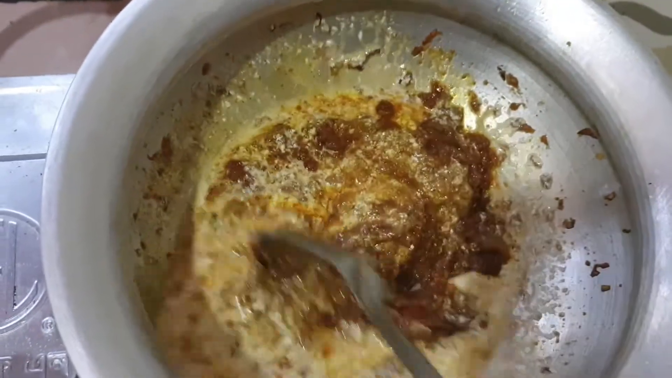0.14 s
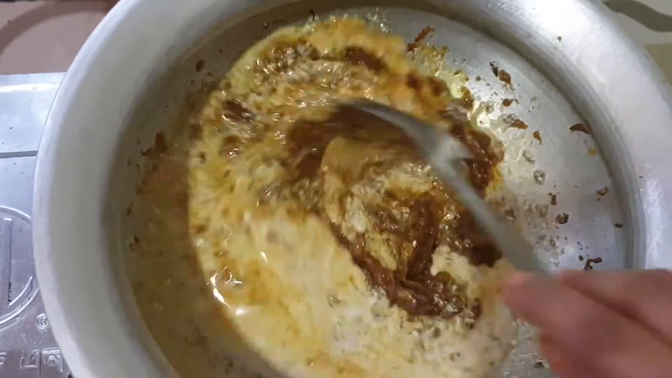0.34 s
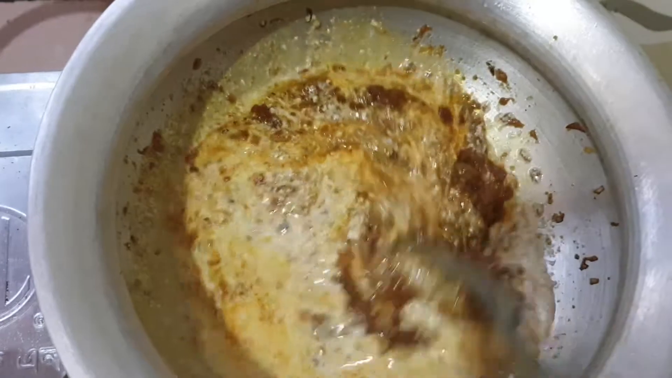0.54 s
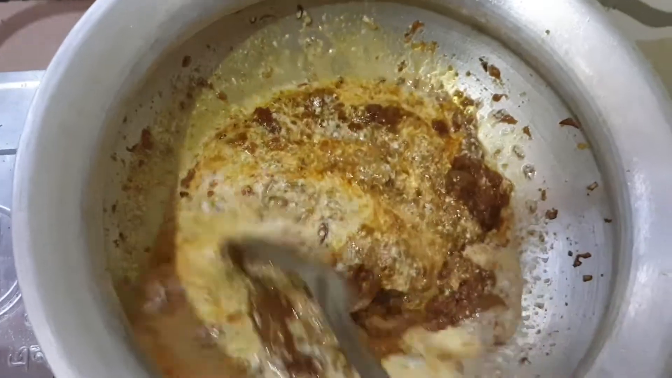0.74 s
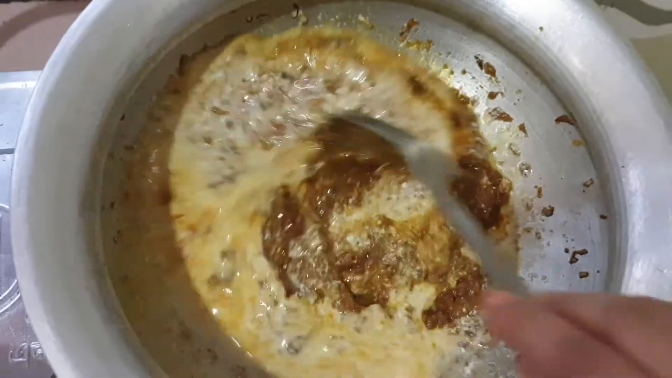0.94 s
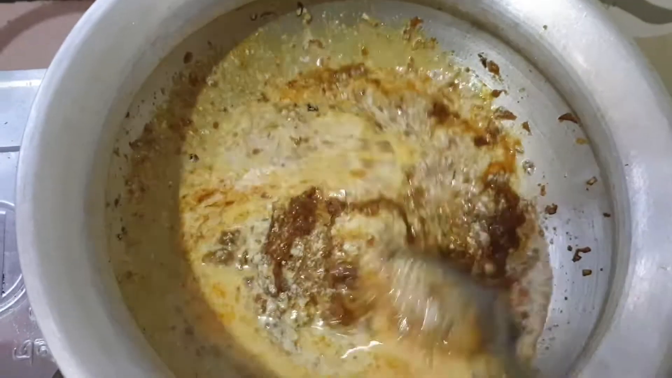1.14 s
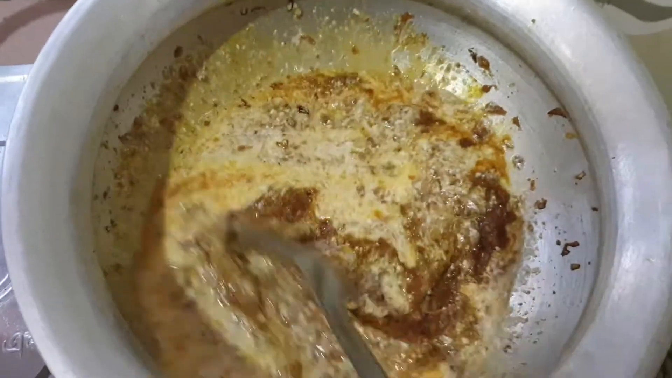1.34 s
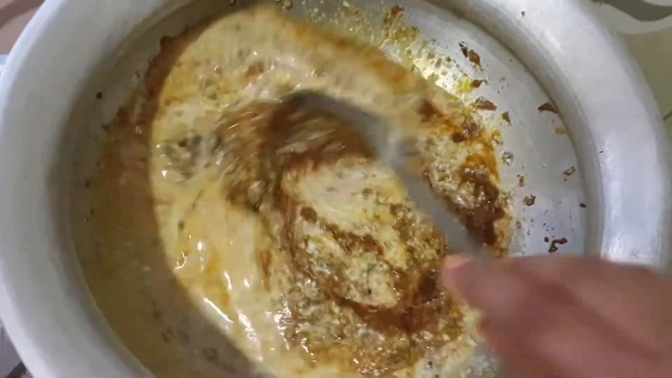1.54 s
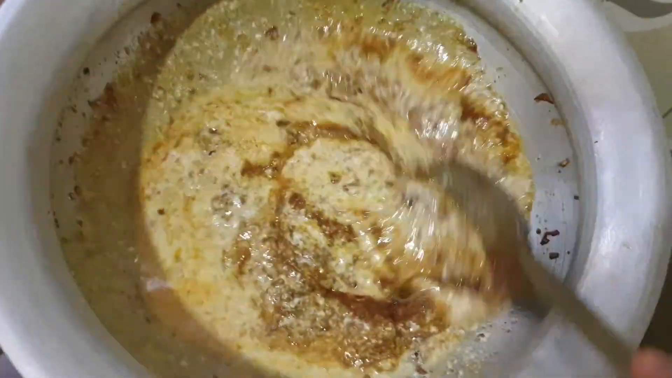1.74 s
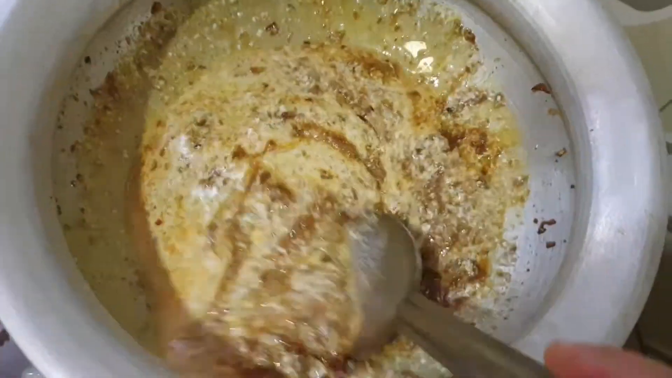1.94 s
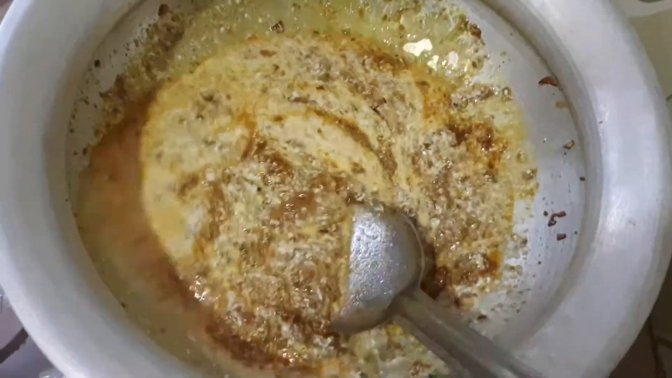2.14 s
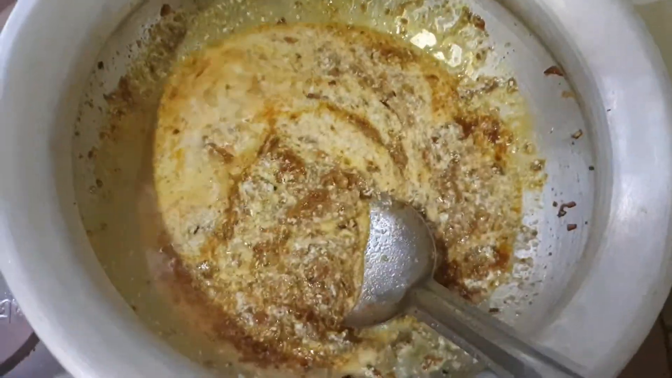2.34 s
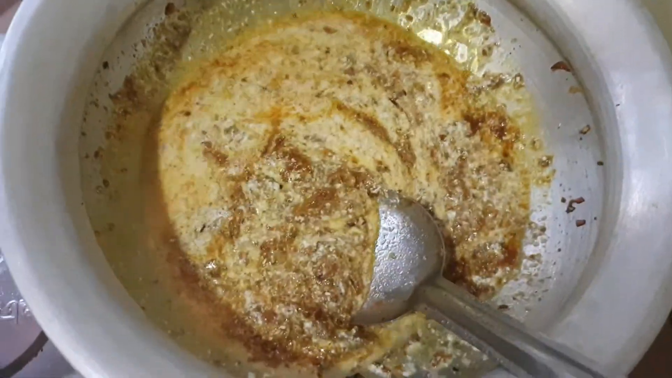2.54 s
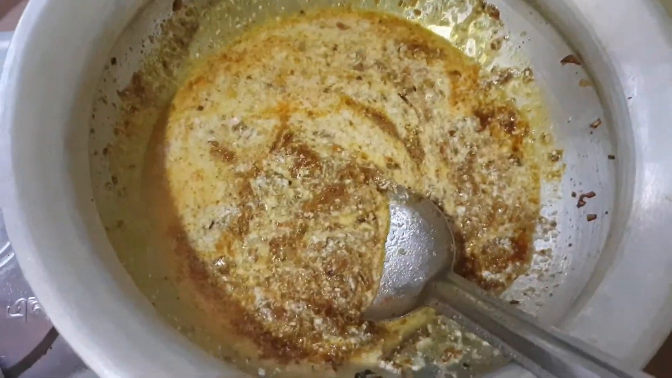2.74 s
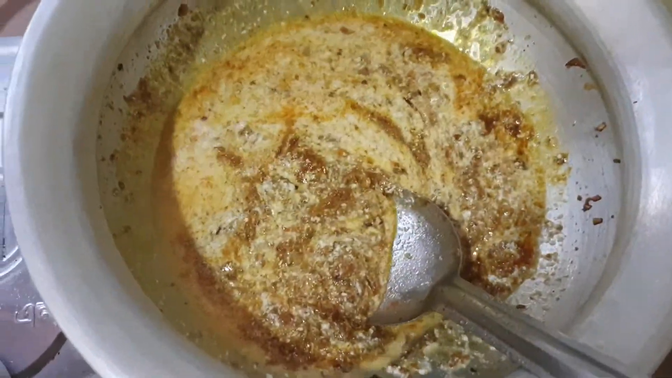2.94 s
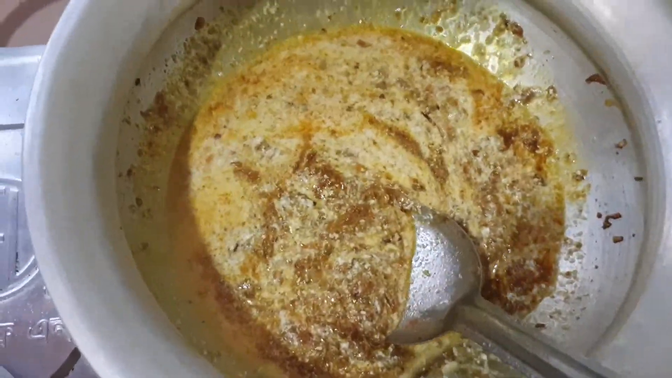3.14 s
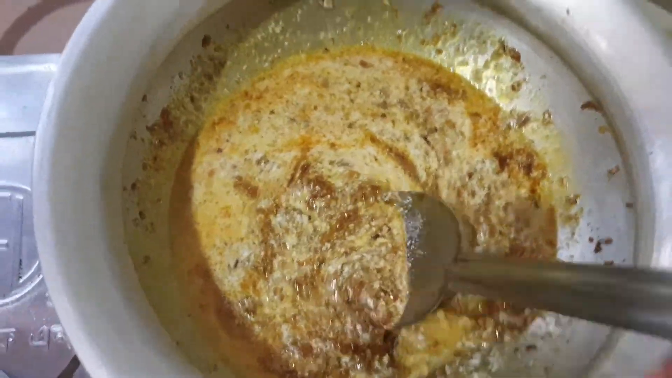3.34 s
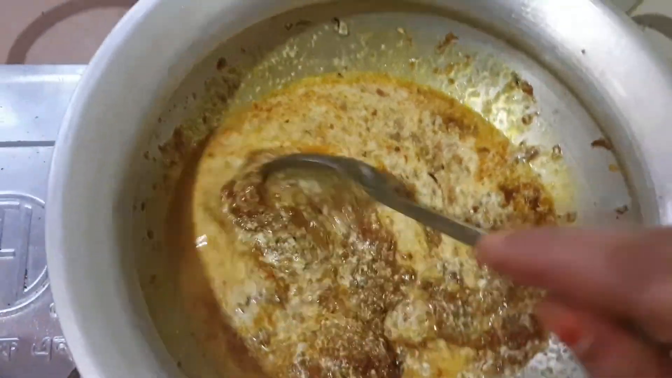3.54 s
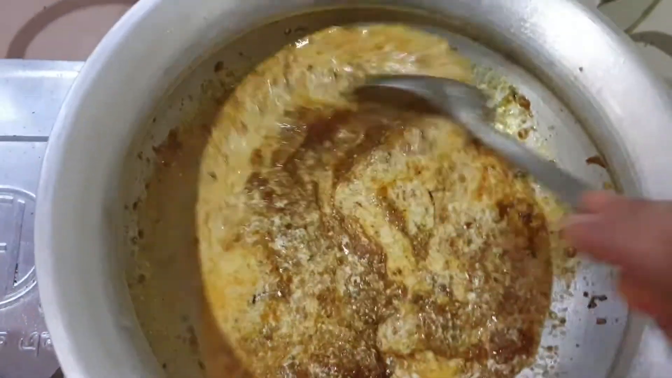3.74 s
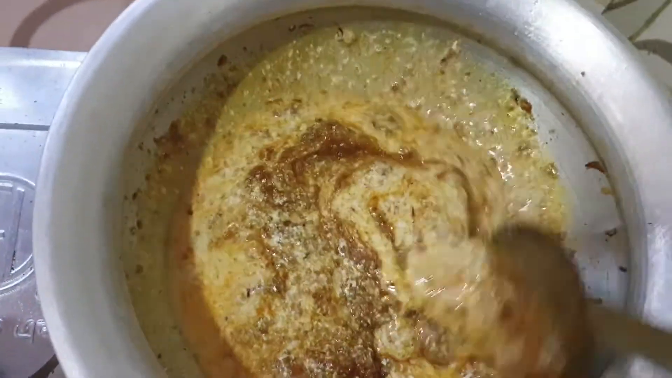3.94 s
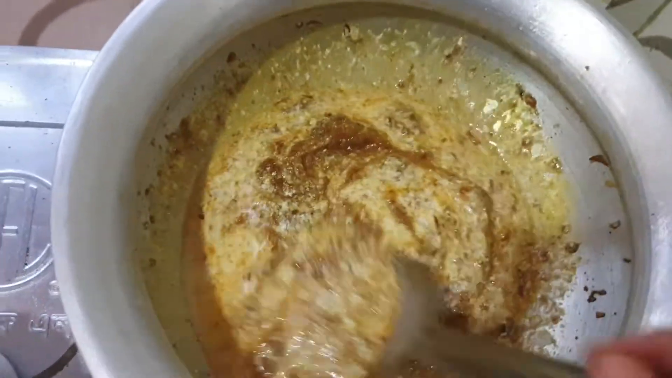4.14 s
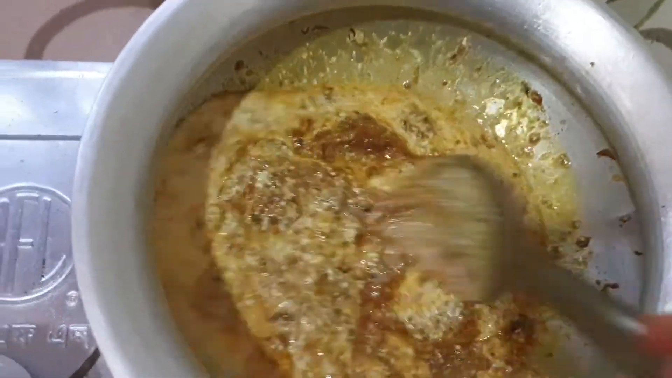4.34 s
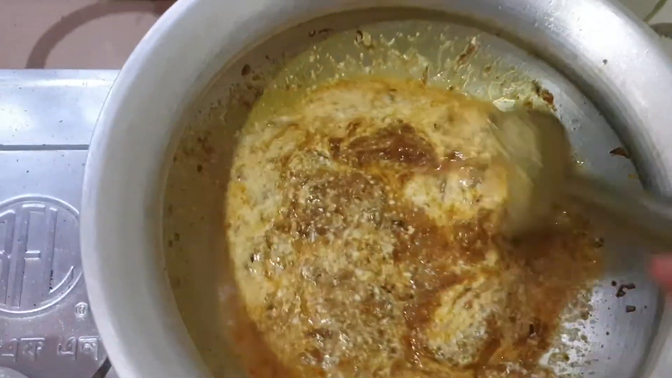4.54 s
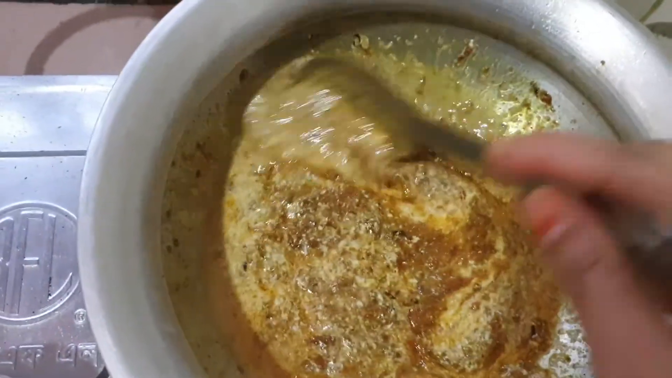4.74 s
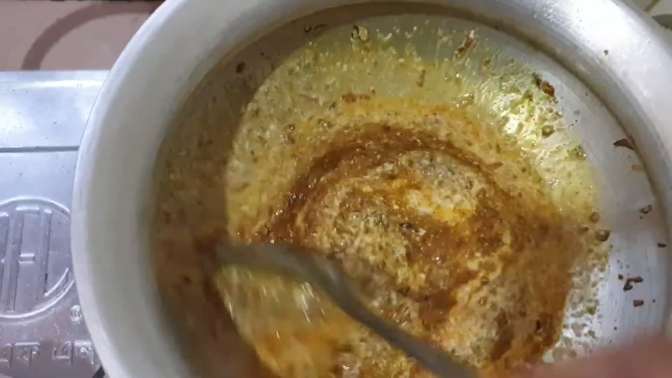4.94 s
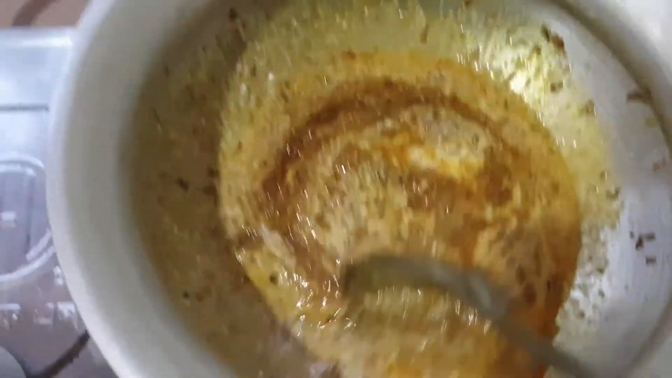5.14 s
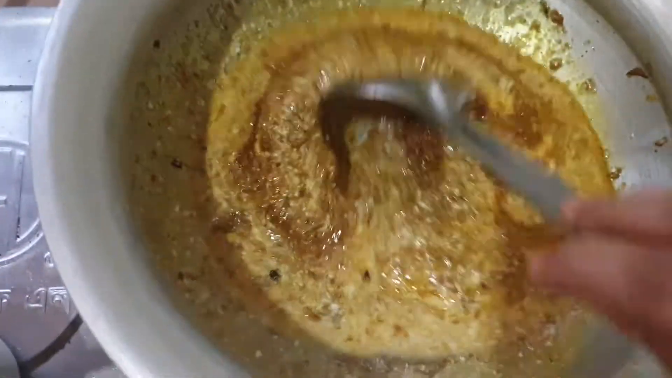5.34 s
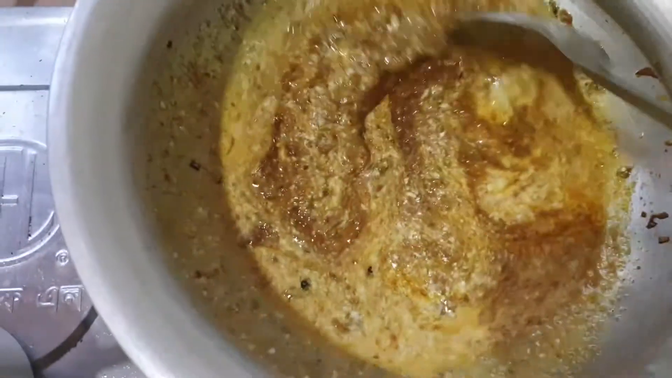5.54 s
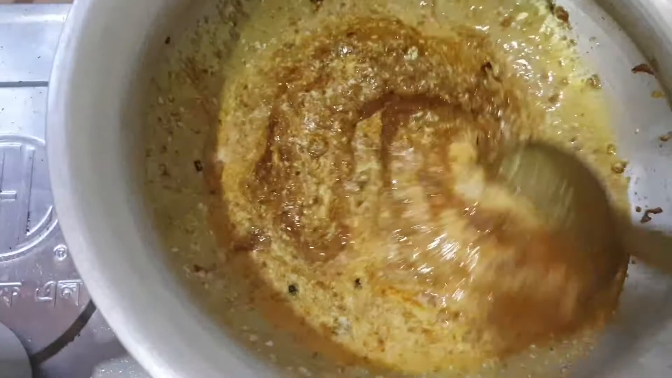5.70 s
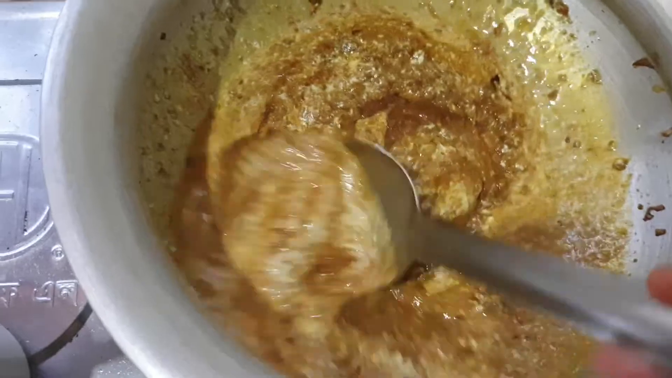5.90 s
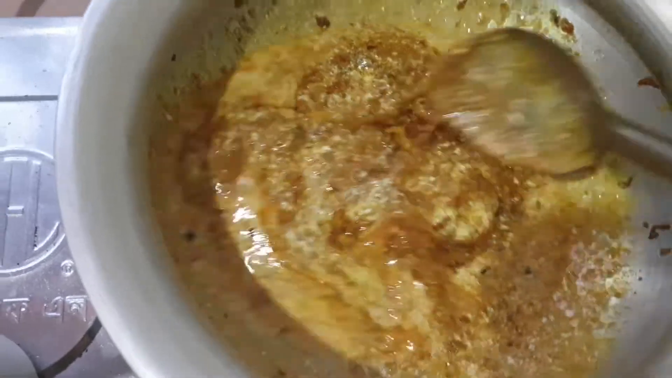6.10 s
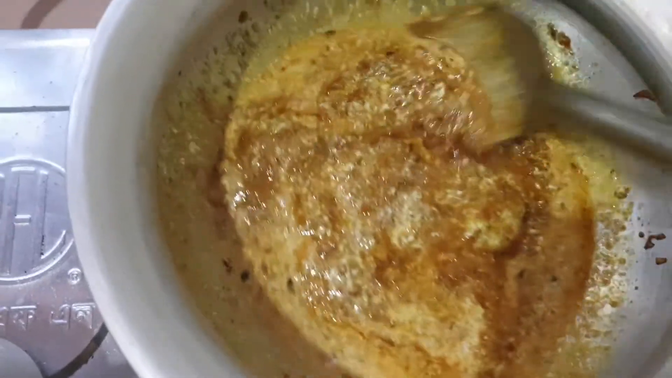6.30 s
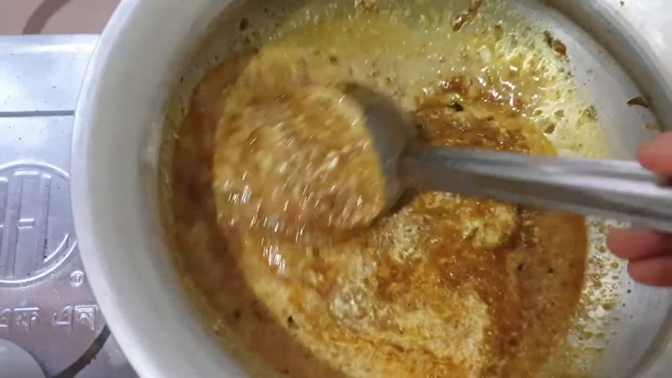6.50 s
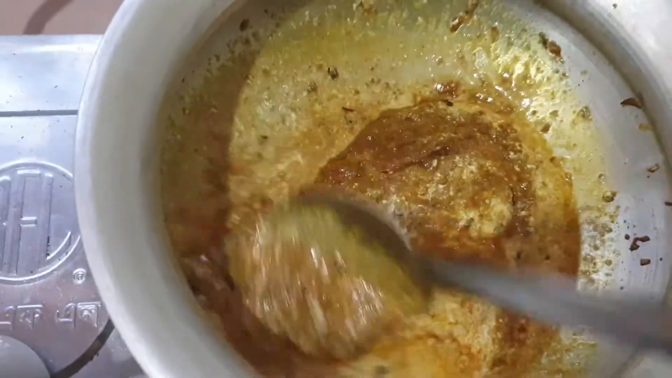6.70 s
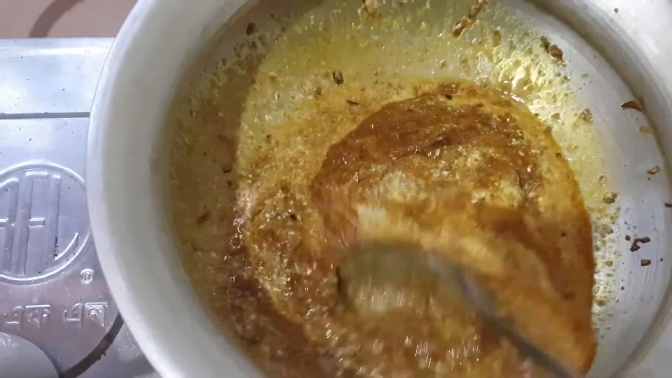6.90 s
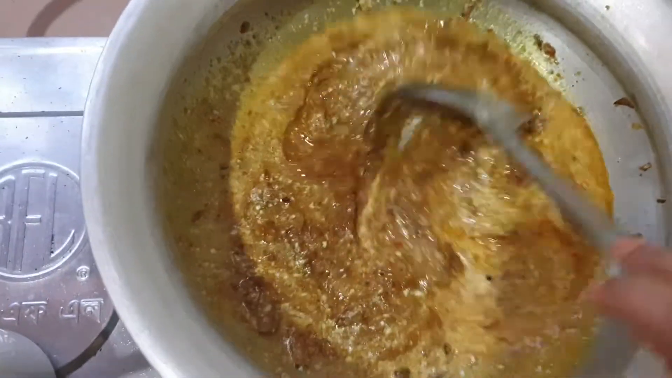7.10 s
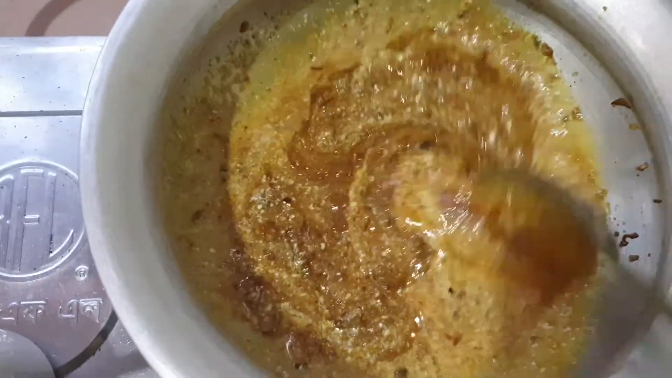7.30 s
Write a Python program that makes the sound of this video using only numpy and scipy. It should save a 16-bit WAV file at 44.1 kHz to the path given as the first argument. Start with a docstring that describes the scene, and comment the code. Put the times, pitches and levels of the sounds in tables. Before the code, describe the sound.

Heard from just above the pot, repeated gritty strokes rumble and rasp on thin metal while fine spitting gradually fades. After a sharp clatter comes a near-quiet gap, then steady frying hiss returns and builds. The spoon goes back in with uneven drags, dull thuds and hollow clacks, ending with a hard knock and hoarse squeaks. A faint room hum and short kitchen tail surround it.

```python
"""A steel spoon stirs thick gravy in an aluminium pot on a stove: slips shake the bottom, crushed spice grinds.
Stick-slip tones make judders and squeaks; knocks and one clatter against the wall ring decaying modes and noise.
Clouds of tiny clicks make a spitting hiss that flares with each scrape and sinks away; a fuller hiss then swells.
Single bubbles pop. Shaped noise makes the low simmer and the room; a short tail makes the small kitchen."""
import sys
import numpy as np
from scipy import signal
from scipy.fft import rfft, irfft, next_fast_len
from scipy.io import wavfile
from scipy.ndimage import uniform_filter1d

SR = 44100
rng = np.random.default_rng(int(sys.argv[2]) if len(sys.argv) > 2 else 0)


def transcribe(signal):
    """Save signal, clipped to [-1, 1], as a 16-bit WAV file at the path in sys.argv[1]."""
    frames = np.atleast_2d(signal).T
    limited = np.clip(frames, -1, 1)
    pcm = np.round(limited * 32767).astype(np.int16)
    wavfile.write(sys.argv[1], SR, pcm)


N = 324576
TIME = np.arange(N) / SR


def from_db(db):
    """Decibels to gain."""
    return 10 ** (np.asarray(db) / 20)


def rms_one(x):
    """Scale to unit power."""
    return x / np.sqrt(np.mean(x ** 2) + 1e-20)


def cut(x, hz, kind, order=2):
    """Causal Butterworth filter."""
    sos = signal.butter(order, np.clip(hz, 10, .45 * SR), kind, fs=SR, output="sos")
    return signal.sosfilt(sos, x + 1e-18)


def drift(rate_hz):
    """Slow random curve with unit RMS, drawn at SR / 40 and interpolated."""
    step, settle = 40, 2000
    noise = rng.standard_normal(N // step + settle + 1)
    slow = rms_one(cut(noise, step * rate_hz, "low")[settle:])
    return np.interp(np.arange(N) / step, np.arange(N // step + 1), slow)


def coloured(x, spectrum):
    """Give a steady texture its spectrum, rolled off below the first point."""
    hz, level_db = np.transpose(spectrum)
    size = next_fast_len(N)
    bins_hz = np.maximum(np.arange(size // 2 + 1) * SR / size, 1)
    gain = from_db(np.interp(np.log(bins_hz), np.log(hz), level_db))
    gain = gain * np.minimum(bins_hz / hz[0], 1) ** 2
    return irfft(rfft(x, size) * gain, size)[..., :N]


def levelled(x, band_hz, span_s):
    """Hold the power within a band near one, keeping flicker faster than span_s."""
    power = cut(np.atleast_2d(x).mean(axis=0), band_hz, "band", order=3) ** 2
    size = max(int(span_s * SR), 1)
    smooth = uniform_filter1d(uniform_filter1d(power, size), size)
    return x / np.sqrt(smooth + 1e-20)


def grains(per_s, spread_db):
    """Random clicks of uneven size and sign."""
    sizes = from_db(spread_db * np.minimum(rng.exponential(1, N), 4))
    signs = rng.choice([-1, 1], N)
    return sizes * signs * (rng.random(N) < per_s / SR)


def blows(start_s, level_db):
    """One click for each contact."""
    out = np.zeros(N)
    np.add.at(out, (np.asarray(start_s) * SR).astype(int), from_db(level_db))
    return out


def ring(clicks, modes):
    """Each click sets modes (hz, level_db, t60_s) ringing as decaying cosines."""
    out = 0
    for hz, level_db, t60_s in modes:
        r, w = from_db(-60 / (t60_s * SR)), 2 * np.pi * hz / SR
        mode = signal.lfilter([1, -r * np.cos(w)], [1, -2 * r * np.cos(w), r * r], clicks + 1e-18)
        out = out + from_db(level_db) * mode
    return out


def dying_noise(t60_s):
    """A stereo burst of unit energy per side that fades away."""
    t = TIME[:int(t60_s * SR) + 2]
    burst = rng.standard_normal((2, len(t))) * from_db(-60 * t / t60_s)
    return burst / np.sqrt(np.sum(burst ** 2, axis=1, keepdims=True))


def spread(x, response):
    """Pass a sound through a stereo response."""
    return signal.oaconvolve(np.atleast_2d(x), response, axes=1)[:, :N]


POT_AIR_T60_S = .035


def pot_air(x, direct_db=-10.0):
    """Sound bounces between the pot's walls and reaches each side differently."""
    return from_db(direct_db) * x + spread(x, dying_noise(POT_AIR_T60_S))


def fizz(per_s, spread_db, count=3):
    """Tiny clicks at several places in the pot, each with its own path out."""
    return sum(pot_air(grains(per_s / count, spread_db)) for place in range(count))


def travelling(x, depth_db, size=512):
    """As the contact moves over the metal, patches of its spectrum swell and fade."""
    bins = signal.stft(x, nperseg=size)[2]
    patches = rng.standard_normal(bins.shape[-2:])
    for axis, width in ((0, 4), (0, 4), (1, 7), (1, 7)):   # frequency, then time
        patches = uniform_filter1d(patches, width, axis=axis)
    return signal.istft(bins * from_db(depth_db * rms_one(patches)), nperseg=size)[1][..., :N]


def sloshed(x, detune):
    """Gravy shifts its weight over the bottom, so the modes wander in pitch (detune: RMS fraction)."""
    position = np.cumsum(1 + detune * drift(7.05))
    return np.interp(position % N, np.arange(N), x)


def dispersed(x, delay_s):
    """Bending waves in thin metal: lows travel slower, so a click becomes a chirp (delay_s at 1 kHz)."""
    size = next_fast_len(N + SR // 10)
    hz = np.arange(size // 2 + 1) * SR / size
    phase = np.exp(-4j * np.pi * delay_s * np.sqrt(1000 * hz))
    return irfft(rfft(x, size) * phase, size)[:N]


def stick_slip(start_s, length_s, glide_hz, level_db, wander, edge_s=0.015):
    """A short unsteady tone gliding from glide_hz[0] to glide_hz[1]."""
    part = slice(int(start_s * SR), int((start_s + length_s) * SR))
    t, out = TIME[part] - start_s, np.zeros(N)
    pitch_hz = np.interp(t, [0, length_s], glide_hz) * wander[part]
    phase = 2 * np.pi * np.cumsum(pitch_hz) / SR
    fade = np.clip(np.minimum(t, length_s - t) / edge_s, 0, 1)
    out[part] = from_db(level_db) * fade * np.sin(phase)
    return out


KITCHEN_T60_S = .27


def kitchen(x, treble_db=-6.5, bass_db=-14.0, dull_hz=6500):
    """The room's short tail; the close pot outweighs it in the bass, where it only adds width."""
    tail = spread(x, dying_noise(KITCHEN_T60_S))
    width = from_db(bass_db) * cut(tail[0], 1430, "low") * [[1], [-1]]
    return x + from_db(treble_db) * cut(tail, [800, dull_hz], "band", order=1) + width


def wide_noise(side_db=-4.5):
    """Noise shared by both sides plus separate noise on each."""
    return rng.standard_normal((1, N)) + from_db(side_db) * rng.standard_normal((2, N))


# room noise spectrum: hz, relative_db
ROOM_SPECTRUM = [(15, -59), (25, -24), (97, -6.5), (226, -37), (311, -6.5), (349, -14.5), (410, -29),
                 (493, -20.5), (936, -26.5), (1410, -19.5), (1550, -27), (1780, -19), (6000, -39),
                 (7800, -69), (13200, -120)]


def room_noise(level_db=-59.0):
    """Steady noise with the room's spectrum."""
    return from_db(level_db) * rms_one(coloured(wide_noise(), ROOM_SPECTRUM))


# simmer rumble spectrum: hz, relative_db
SIMMER_SPECTRUM = [(25, -14), (60, -18), (95, 5.5), (140, -5), (180, -14.5), (300, 0), (420, -13), (500, 0),
                   (800, -31.5), (2000, -28.5)]


def simmer(level_db=-56.5, lumps_db=2.2):
    """Low lumpy rumble of the simmering pot: shaped noise, heard faintly at first, fully from 3 s."""
    rumble = rms_one(coloured(wide_noise(), SIMMER_SPECTRUM))
    rise = np.interp(TIME, [2.6, 3.0], [.3, 1])
    return rumble * from_db(level_db + lumps_db * drift(15.0)) * rise


# spitting level over time, before trim and flare: time_s, level_db
SPIT_LEVELS = [(0.0, -51.5), (.4, -55.5), (1.5, -63), (1.68, -69), (2.1, -73), (2.68, -81.5)]
# spitting spectrum: hz, relative_db
SPIT_SPECTRUM = [(900, -19), (2000, 4.5), (3500, 3), (5500, 5.5), (8000, 5), (9700, 0), (12000, 0.5),
                 (15500, -1)]


def spitting(bared, trim_db=2.0, flare_db=4.5):
    """Countless tiny steam bubbles burst in the fat, more loudly while a scrape bares hot metal."""
    spit = levelled(coloured(fizz(5000, 2.3), SPIT_SPECTRUM), [10000, 15000], .1)
    level_db = np.interp(TIME, *np.transpose(SPIT_LEVELS))
    return from_db(trim_db + level_db + flare_db * bared) * spit


# sizzle spectrum: hz, relative_db
SIZZLE_SPECTRUM = [(500, -19), (900, -11.5), (1250, 0), (1480, -9.5), (1740, 0), (2100, -7), (3200, -11),
                   (3560, -5.5), (4300, -8.5), (6200, -8.5), (7300, 2), (8600, -8), (9800, -17.5),
                   (13000, -11.5)]
SIZZLE_START_S, SIZZLE_ATTACK_S, SIZZLE_SWELL_S = 2.685, 0.022, 0.37
SIZZLE_DB, SIZZLE_FIRST_DB = -50.5, -10.5   # base level; onset relative to it
SIZZLE_WANDER_DB, SIZZLE_SAG_DB_PER_S = 0.85, 0.52


def sizzle():
    """The hiss returns quickly with denser clicks, swells, then eases a little."""
    hiss = levelled(coloured(fizz(9000, 2.3), SIZZLE_SPECTRUM), [6800, 8500], .2)
    age_s = np.maximum(TIME - SIZZLE_START_S, 0)
    attack = np.minimum(age_s / SIZZLE_ATTACK_S, 1)
    swell_db = SIZZLE_FIRST_DB * np.exp(-age_s / SIZZLE_SWELL_S) - SIZZLE_SAG_DB_PER_S * age_s
    return attack * from_db(SIZZLE_DB + swell_db + SIZZLE_WANDER_DB * drift(2.8)) * hiss


# single bubbles, before trim: start_s, pitch_hz, level_db
POPS = [(4.031, 5700, -34), (4.081, 2060, -24), (5.662, 2657, -21.5)]


def pops(t60_s=0.032, trim_db=-5):
    """A bursting bubble rings briefly."""
    return sum(ring(blows([start_s], [level_db]), [(pitch_hz, trim_db, t60_s)])
               for start_s, pitch_hz, level_db in POPS)


# loaded pot modes: pitch_hz, t60_s (undamped), bottom_hit_db, wall_hit_db (relative)
POT_MODES = [(98, 0.52, -32, -28), (123.3, 0.46, -53, -21), (143.9, 0.89, -15.5, -23),
             (198.6, 0.37, -21, -14.5), (212.3, 0.45, -13, -0.5), (261, 0.38, -10.5, -13),
             (284.7, 0.69, -3.5, -37), (308, 0.43, -7.5, -10), (336.4, 0.65, 2, -20),
             (337.5, 0.19, -48, -0.5), (483, 0.32, -11.5, -2), (505.2, 0.49, -10.5, -3),
             (523.4, 0.45, -13, -23), (558.7, 0.26, -11.5, -8), (612, 0.97, -39, -39),
             (730, 0.37, -66, -27), (1102, 0.095, -7, -2.5), (1189, 0.3, -18.5, -19)]


def pot_modes(hit, t60_scale=1.0):
    """Pot modes for a hit on the bottom or wall; a touching spoon shortens the ring."""
    level_column = {"bottom": 2, "wall": 3}[hit]
    return np.array(POT_MODES)[:, [0, level_column, 1]] * [1, 1, t60_scale]


# spoon falls against the wall and bounces: start_s, relative_db
CLATTER = [(2.1107, -7.5), (2.113, -5.5), (2.1356, -6), (2.147, -17), (2.166, -13.5)]
# free spoon modes: pitch_hz, relative_db, t60_s
SPOON_MODES = [(2187, -3, .19), (2236, -6, .19), (2267, -8, .17), (2307, -9, .17), (2356, -11, .2),
               (2439, -9, .18), (2475, -13, .18), (3015, -17, .14), (3083, -19, .16), (3365, -18, .15),
               (3926, -14, .2), (4288, -13, .15), (4970, -15, .15), (6418, -17, .15), (6540, -17, .14),
               (7700, -16, .15)]


def clatter(pot_db=-17.0, spoon_db=-14.5, crack_db=21.5, wash_db=16.0, shimmer_db=4.0, body_db=23.5):
    """Steel hits the wall: a crack, pot and spoon modes, and a dense wash whose top dies first."""
    start_s, level_db = np.transpose(CLATTER)
    hits = dispersed(blows(start_s, level_db), .002)
    pot = cut(ring(hits, pot_modes("wall")), [100, 1400], "band")
    spoon = cut(ring(hits, SPOON_MODES), 1600, "high", order=3)
    hard_hits = blows(start_s, 2 * level_db)   # doubled dB favours hard blows
    crack = cut(spread(hard_hits, dying_noise(0.056)), [2200, 11000], "band")
    body = cut(spread(hits, dying_noise(0.34))[0], [220, 620], "band", order=3)
    wash = cut(spread(hits, dying_noise(.24)), [2000, 5500], "band")
    shimmer = cut(spread(hits, dying_noise(0.11)), [5500, 12000], "band", order=1)
    metal = from_db(pot_db) * pot + from_db(spoon_db) * spoon
    dense = from_db(body_db) * body + from_db(wash_db) * wash + from_db(shimmer_db) * shimmer
    return metal + from_db(crack_db) * crack + dense


# spoon bumps the pot under the gravy, before trims: start_s, clack_db, thud_db, tick_db
KNOCKS = [(0.0799, -39, -22.5, -52), (0.72, -56, -22, -55), (1.041, -24, -26, -39),
          (1.6191, -32.5, -39, -50), (1.692, -31.5, -32.5, -55), (1.8361, -33, -29, -48),
          (2.9218, -39.5, -40, -42), (3.6876, -35, -28.5, -25), (3.8867, -36, -35.5, -40),
          (4.2071, -31.5, -33.5, -33), (4.2471, -33, -21.5, -39), (4.9334, -25.5, -27, -26),
          (5.6611, -33, -29.5, -43), (5.889, -34, -51, -28), (6.2245, -46, -22, -35),
          (6.449, -48, -25.5, -47), (6.5159, -26.5, -22.5, -38), (6.8414, -8.5, -17.5, -16.5),
          (6.919, -21, -31, -38), (7.318, -28, -34, -30)]


def rocking(trim_db=-16.5):
    """Knocks also rock the pot on its stand, which booms low in step with the clack level."""
    start_s, clack_db, _, _ = np.transpose(KNOCKS)
    boom = ring(blows(start_s, clack_db + trim_db), [(55, -15, 0.18), (148, -2.5, 0.11), (204, 2.0, 0.16)])
    return cut(boom, 230, "low", order=3)


def knocks(thud_trim_db=-7.0, clack_trim_db=11.5, tick_trim_db=18.0, t60_scale=0.61, cushion_hz=600):
    """The held spoon bumps and damps the pot: a thud cushioned by gravy, a hollow clack and a tick."""
    start_s, clack_db, thud_db, tick_db = np.transpose(KNOCKS)
    thud = ring(blows(start_s, thud_db + thud_trim_db), pot_modes("bottom", t60_scale))
    thud = cut(cut(thud, cushion_hz, "low", order=6), 113, "high", order=1)
    hollow_modes = [(690, -17, 0.044), (1106, -11.5, 0.018), (2030, -22.5, 0.017)]
    clack = ring(blows(start_s, clack_db + clack_trim_db), hollow_modes)
    tick = spread(blows(start_s, tick_db + tick_trim_db), dying_noise(0.019))
    tick = cut(tick, [2500, 7000], "band", order=1)
    return thud + pot_air(cut(clack, [600, 3500], "band")) + tick


# edge skids on bare metal, before trim: start_s, length_s, first_hz, last_hz, level_db
SQUEAKS = [(0.246, 0.064, 1200, 1075, -33.5), (0.823, 0.082, 2450, 2275, -34.5),
           (5.723, 0.022, 3480, 3300, -29), (5.78, 0.028, 2000, 2000, -30.5),
           (6.913, 0.043, 5600, 4650, -29.5), (7.043, 0.075, 1950, 1625, -29.5),
           (7.112, 0.056, 2000, 2400, -31)]


def squeaks(trim_db=-2.5):
    """Fast, ragged slips on bare metal give a hoarse pitch."""
    wander, ragged = 1 + .06 * drift(300), from_db(3 * drift(200))
    tones = sum(stick_slip(start_s, length_s, [first_hz, last_hz], level_db, wander)
                for start_s, length_s, first_hz, last_hz, level_db in SQUEAKS)
    return from_db(trim_db) * pot_air(tones * ragged)


# edge sticks and slips: start_s, length_s, pitch_hz, level_db (sine peak before flutter)
JUDDERS = [(0.29, 0.087, 337, -20.5), (0.934, 0.068, 346, -20.5), (1.495, 0.082, 341.6, -20),
           (1.845, 0.064, 266.4, -34.5), (4.248, 0.052, 287, -23.5), (5.264, 0.066, 341, -26),
           (6.512, 0.05, 281, -24.5), (7.093, 0.047, 335, -18), (7.315, 0.073, 560, -26.5)]


def judders(waver=0.033, flutter_db=1.0):
    """Regular slips make short groans of wavering pitch and level."""
    wander, flutter = 1 + waver * drift(53), from_db(flutter_db * drift(38))
    tones = sum(stick_slip(start_s, length_s, [pitch_hz, pitch_hz], level_db, wander)
                for start_s, length_s, pitch_hz, level_db in JUDDERS)
    return flutter * tones


def push(start_s, length_s, bite_db_per_s=374, release_db_per_s=174):
    """A drag sets in quickly, holds, and lets go."""
    before_s = np.clip(start_s - TIME, 0, 1)
    after_s = np.clip(TIME - start_s - length_s, 0, 1)
    return from_db(-bite_db_per_s * before_s - release_db_per_s * after_s)


def pressure(hardest_s, swell_s, fade_s, depth_db=21, roundness=1.43):
    """One scrape's force peaks at one, depth_db down at swell_s before and fade_s after."""
    away = np.maximum((hardest_s - TIME) / swell_s, (TIME - hardest_s) / fade_s)
    return from_db(-depth_db * np.minimum(away, 10) ** roundness)   # roundness 1 pointed, 2 round


# spoon pushed along the bottom, before mix: start_s, length_s, level_db
DRAGS = [(0.0, 0.42, -29), (0.505, 1.08, -27), (1.667, 0.25, -38.5), (3.485, 0.25, -35.5),
         (3.912, 0.066, -32), (4.247, 0.031, -30.5), (4.657, 0.55, -29), (5.26, .11, -27),
         (5.69, 0.093, -30.5), (5.922, 0.028, -40), (6.434, .14, -35), (6.881, 0.28, -28.5),
         (7.323, .04, -36)]
# edge bears down on bare metal, before mix: hardest_s, swell_s, fade_s, grind_db, rasp_db
SCRAPES = [(0.014, 0.13, 0.093, -45, -40), (0.289, 0.07, 0.055, -31.5, -42.5), (.58, 0.17, 0.11, -37, -38),
           (.86, 0.22, 0.11, -37, -39.5), (1.18, 0.18, 0.12, -38, -39.5), (1.525, 0.23, 0.081, -34.5, -40),
           (1.84, 0.13, 0.17, -50, -52.5), (3.665, 0.21, 0.11, -35, -39), (3.896, 0.029, 0.071, -40, -36.5),
           (4.249, 0.026, 0.028, -36, -45), (4.76, 0.22, 0.27, -36.5, -41.5),
           (4.98, 0.24, 0.16, -41.5, -36), (5.22, 0.33, .2, -35.5, -41), (5.666, 0.0088, 0.031, -45, -39.5),
           (5.784, 0.11, 0.042, -35, -39.5), (5.891, 0.0079, 0.069, -37, -41),
           (6.519, .005, 0.021, -44, -38.5), (6.93, 0.058, 0.11, -32.5, -33), (7.12, 0.1, .085, -33, -36.5),
           (7.322, 0.017, 0.23, -36.5, -38)]
LOOSE_GRIND_DB, LOOSE_RASP_DB = -25, -25.5   # loose spice, relative to the drag
SCRAPE_SHAKE_DB = -6.5   # drag added by a scrape, relative to its grinding


def spoon_work():
    """Hand motion over time: gains of drag, grinding and rasp, and how far the metal is bared (0-1)."""
    forces = np.array([pressure(*scrape[:3]) for scrape in SCRAPES])
    scrape_grind, scrape_rasp = from_db(np.array(SCRAPES)[:, -2:].T) @ forces
    push_drag = sum(from_db(level_db) * push(start_s, length_s) for start_s, length_s, level_db in DRAGS)
    drag = np.hypot(push_drag, from_db(SCRAPE_SHAKE_DB) * scrape_grind)
    grind = np.hypot(scrape_grind, from_db(LOOSE_GRIND_DB) * push_drag)
    rasp = np.hypot(scrape_rasp, from_db(LOOSE_RASP_DB) * push_drag)
    return drag, grind, rasp, forces.max(axis=0)


# coarse grinding spectrum: hz, relative_db
GRIND_SPECTRUM = [(500, 1.5), (720, 3.5), (900, -5), (1130, 12), (1300, 2.5), (1520, -21), (1800, 4),
                  (2250, 3), (2900, -6.5), (4000, -15.5), (9000, -21)]
# fine rasp spectrum: hz, relative_db
RASP_SPECTRUM = [(1500, -5), (2600, 1), (3300, -0.5), (4300, -2.5), (5600, -2.5), (6300, -4), (8000, -8),
                 (9600, -15), (15500, -19.5)]


def stirring(drag, grind, rasp, drag_db=-5.0, grind_db=-5.5, rasp_db=-3.0, catch_db=1.5, wall_hz=1300):
    """Slips of the spoon's edge shake the bottom; spice grains crushed under it grind and rasp."""
    bottom = ring(grains(700, 2.65), pot_modes("bottom", .5))   # pressed spoon halves the ring time
    bottom = cut(bottom, [65, wall_hz], "band")
    bottom = levelled(travelling(sloshed(bottom, .045), 3.5, size=2048), [200, 700], .04)
    catching = from_db(catch_db * drift(34))   # the edge catches and frees itself
    coarse = coloured(fizz(1100, 3.6) * catching, GRIND_SPECTRUM)
    coarse = levelled(travelling(coarse, 3.0), [900, 3000], .06)
    fine = coloured(fizz(2500, 3.1) * catching, RASP_SPECTRUM)
    fine = levelled(travelling(fine, 2.5), [3000, 6300], .06)
    return from_db(drag_db) * drag * bottom + from_db(grind_db) * grind * coarse + from_db(rasp_db) * rasp * fine


def scene():
    """Pot in the kitchen over the background, all leaning a little to the right."""
    drag, grind, rasp, bared = spoon_work()
    frying = spitting(bared) + sizzle() + pops()
    contacts = rocking() + clatter() + knocks() + squeaks() + judders()
    pot = frying + contacts + stirring(drag, grind, rasp)
    return (kitchen(pot) + room_noise() + simmer()) * from_db([[-1.2], [1.2]])


def record(dry, cutoff_hz=15800):
    """Peaks are rounded and the top is cut."""
    lowpass = signal.ellip(10, .1, 80, cutoff_hz, fs=SR, output="sos")
    return signal.sosfilt(lowpass, np.tanh(dry))


dry = scene()
out = record(dry)
transcribe(out)
```